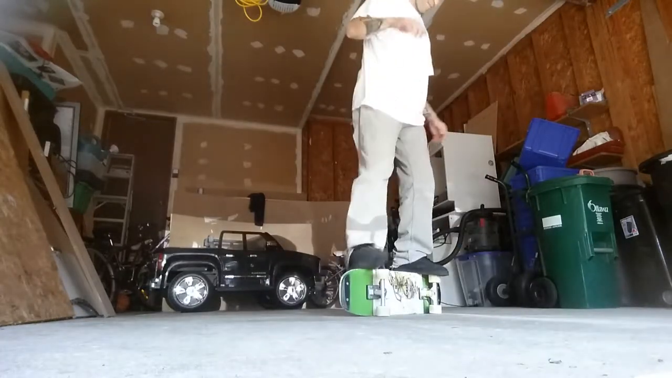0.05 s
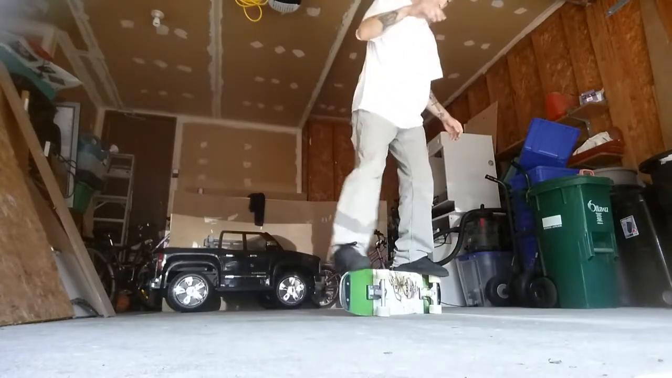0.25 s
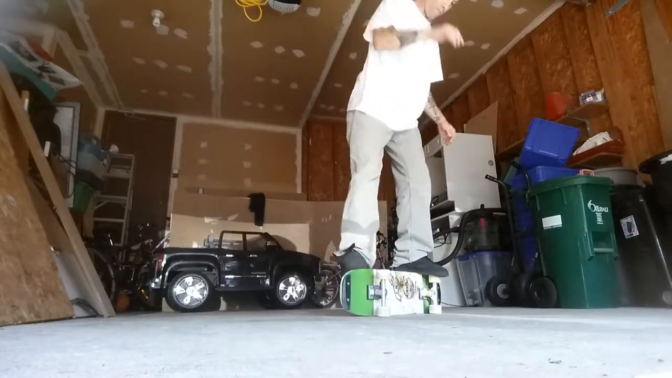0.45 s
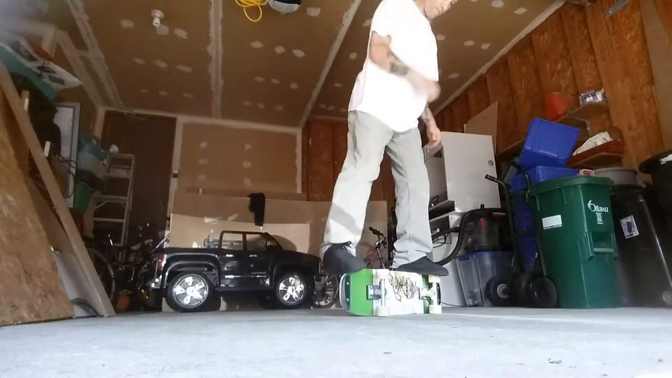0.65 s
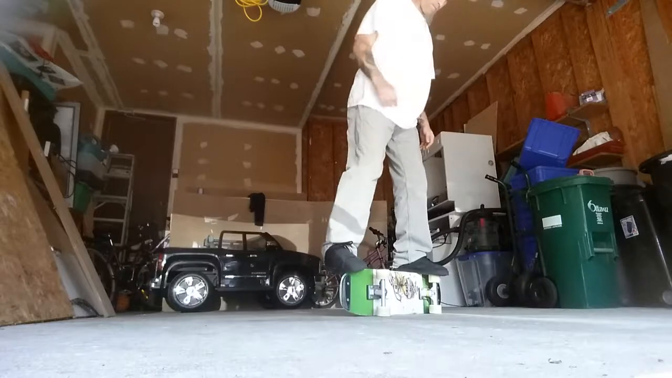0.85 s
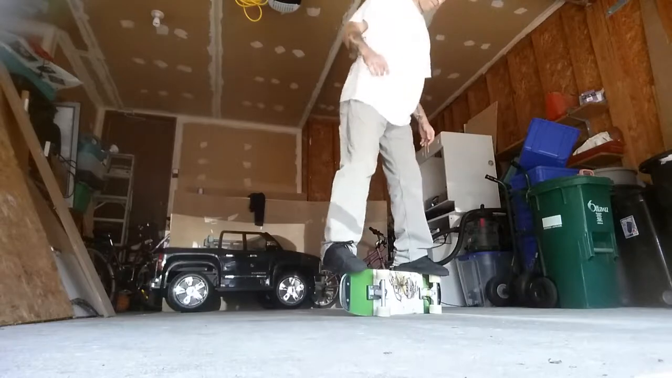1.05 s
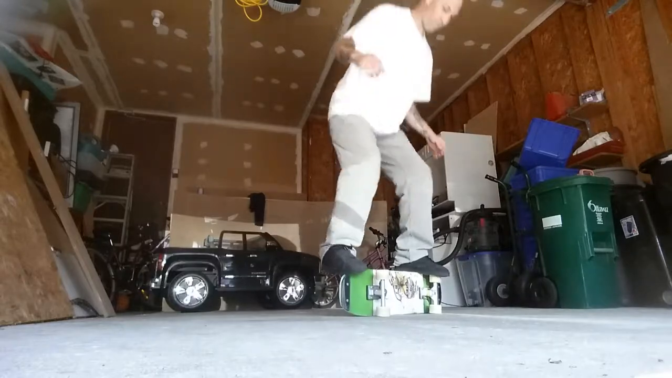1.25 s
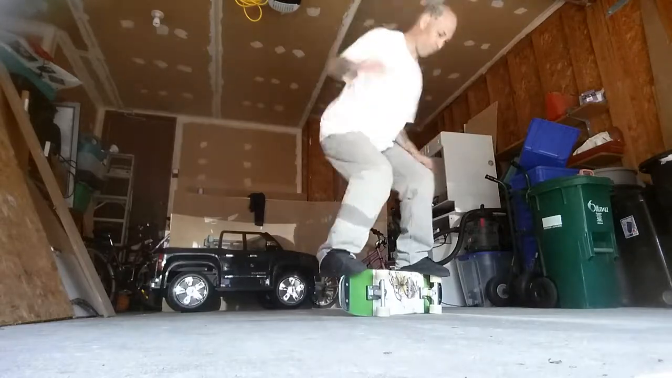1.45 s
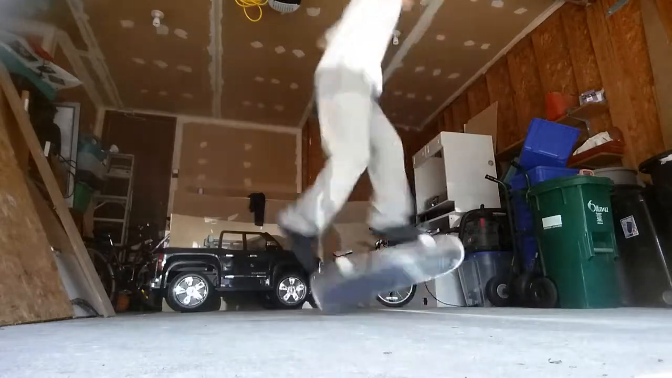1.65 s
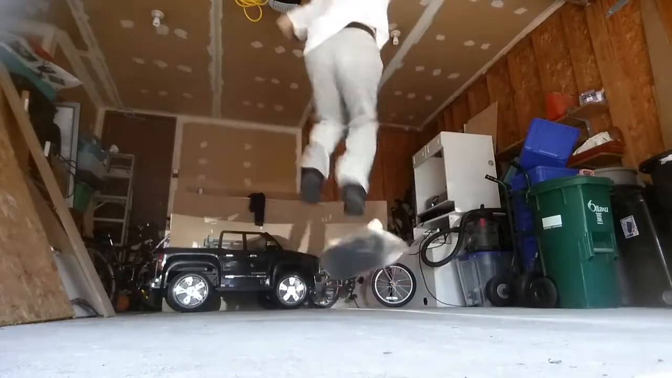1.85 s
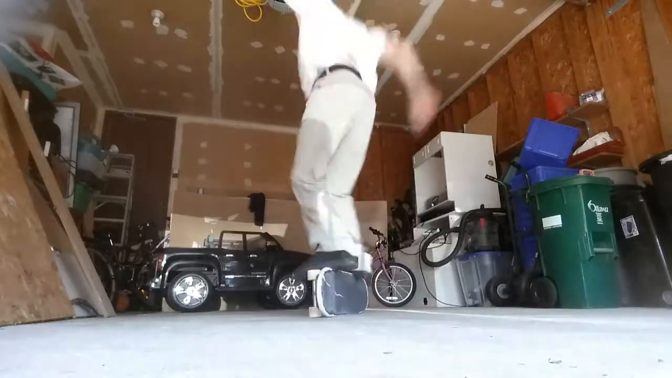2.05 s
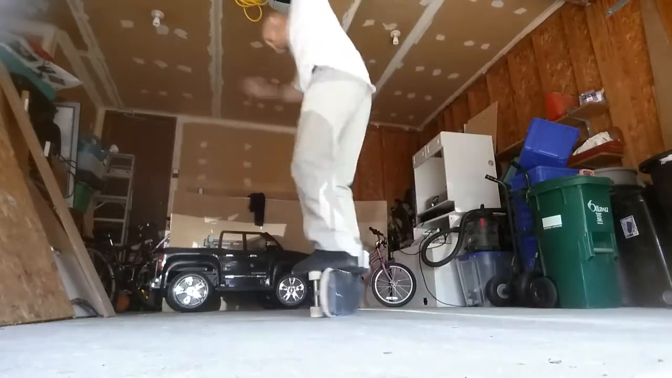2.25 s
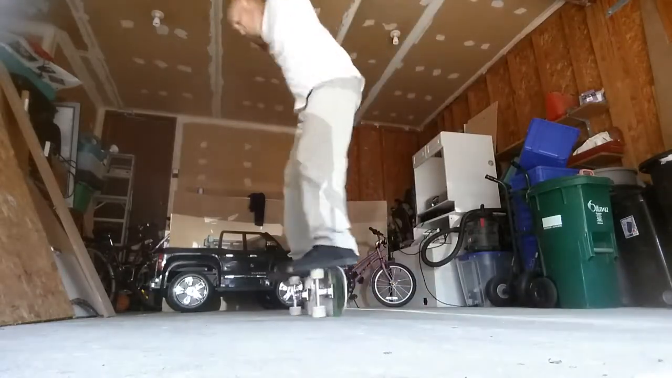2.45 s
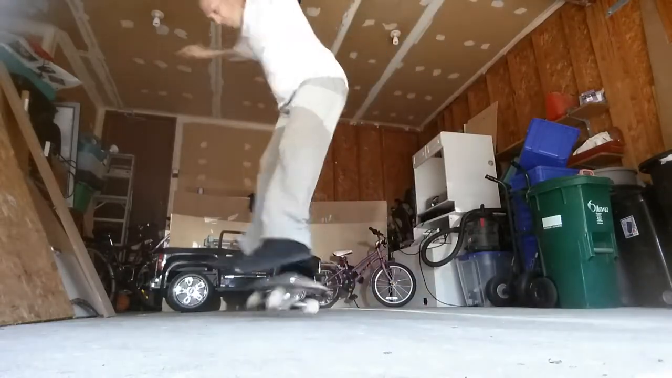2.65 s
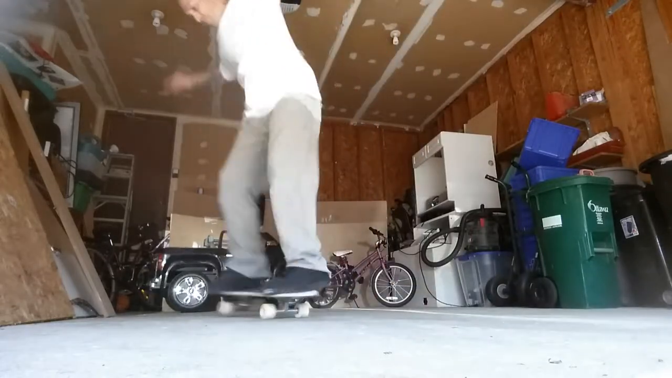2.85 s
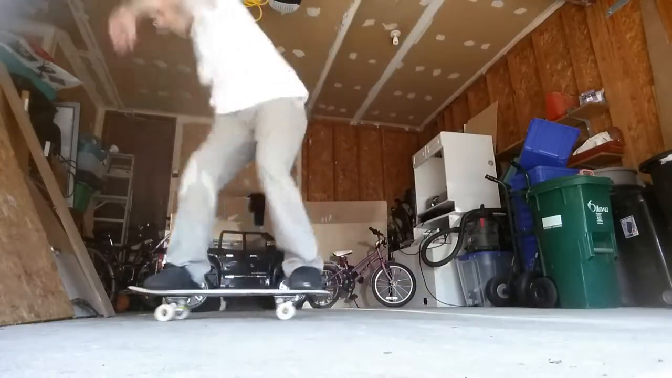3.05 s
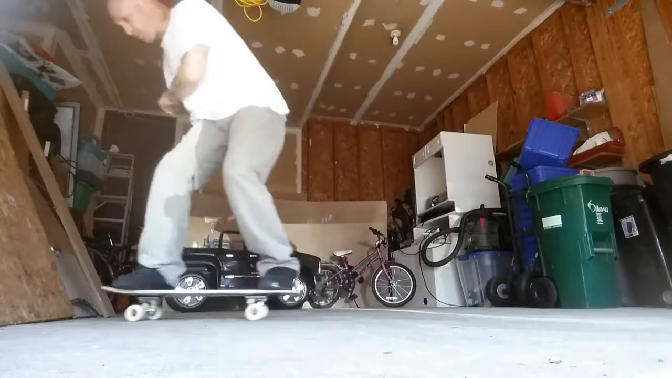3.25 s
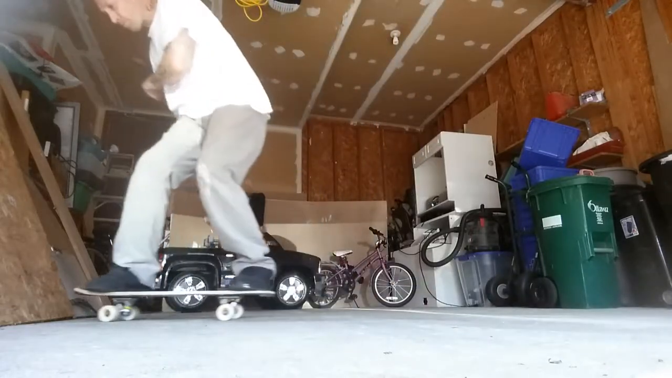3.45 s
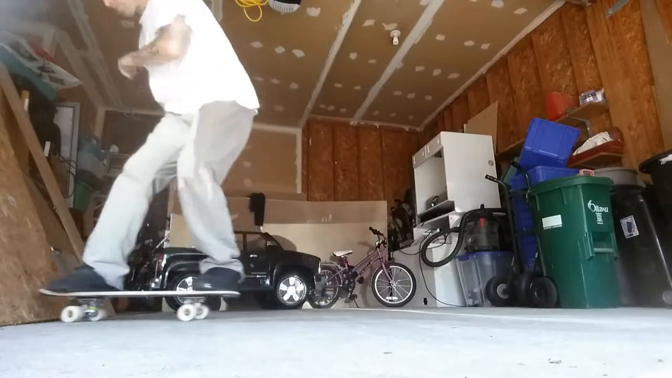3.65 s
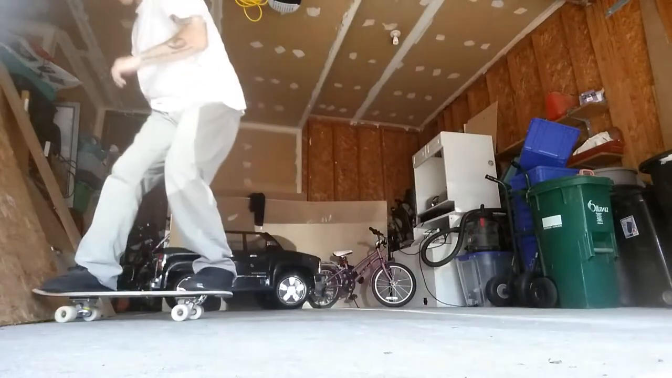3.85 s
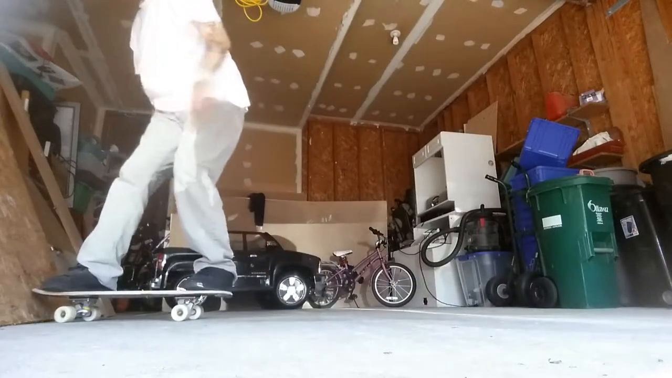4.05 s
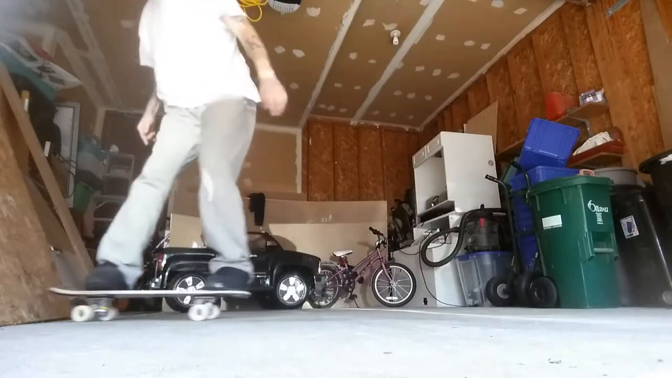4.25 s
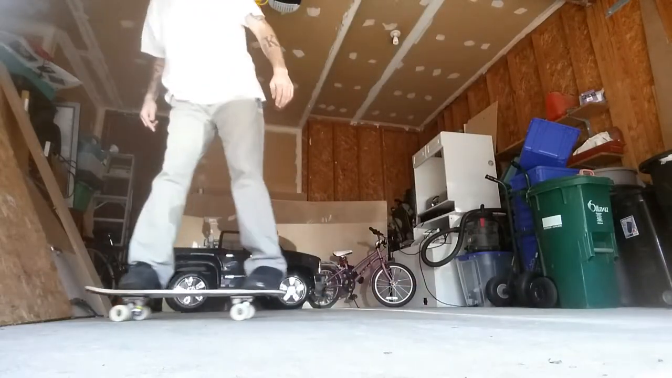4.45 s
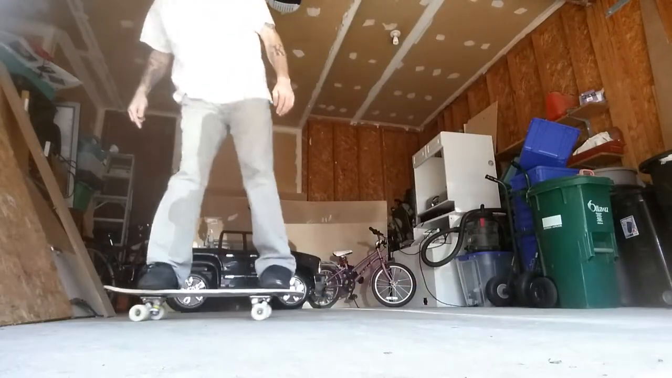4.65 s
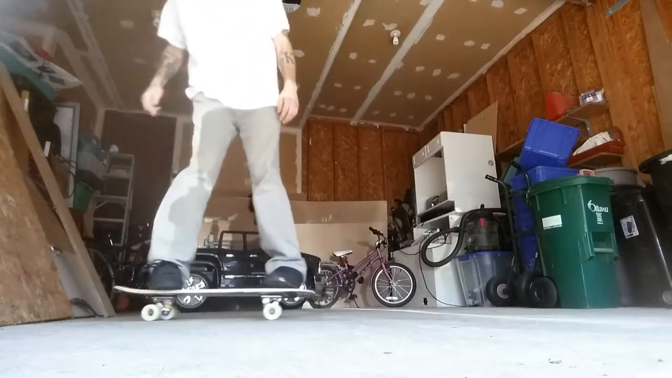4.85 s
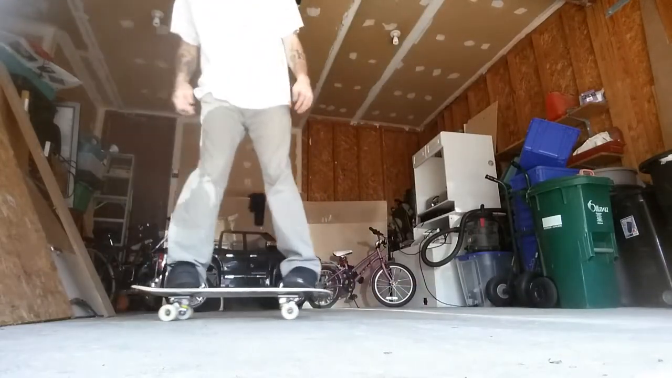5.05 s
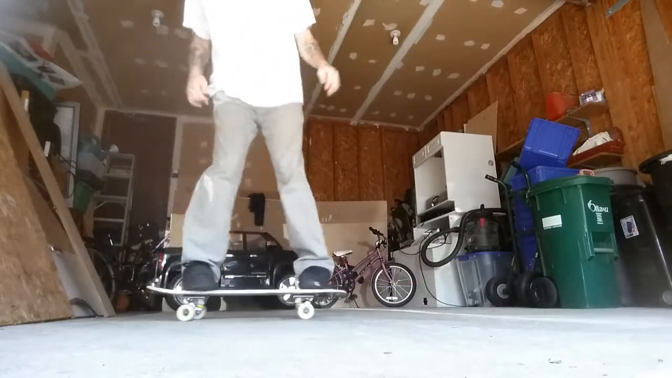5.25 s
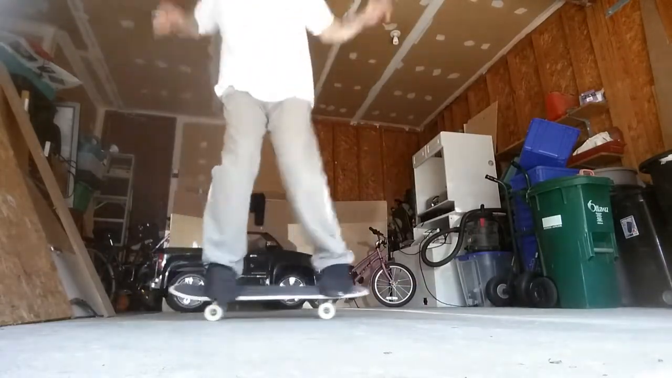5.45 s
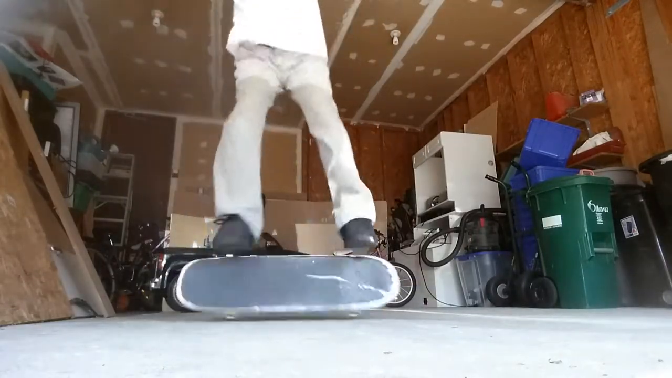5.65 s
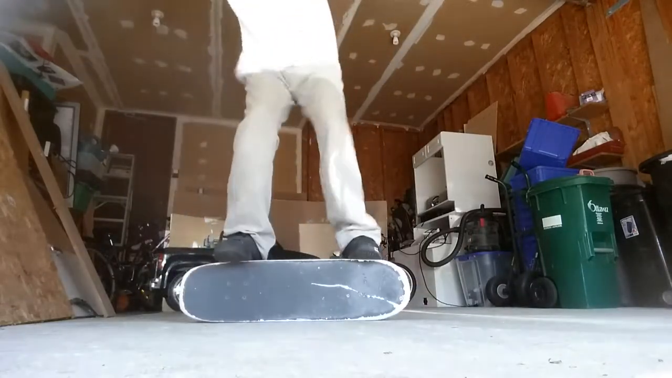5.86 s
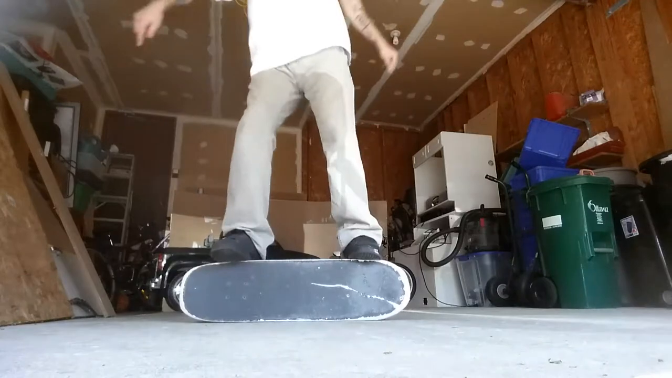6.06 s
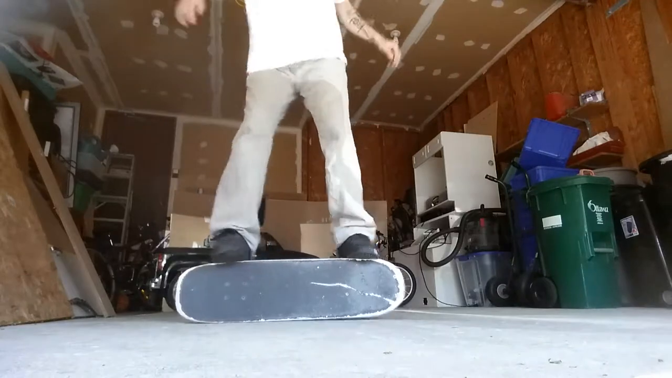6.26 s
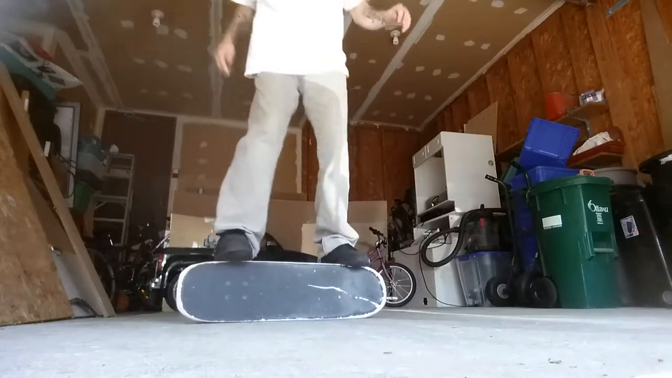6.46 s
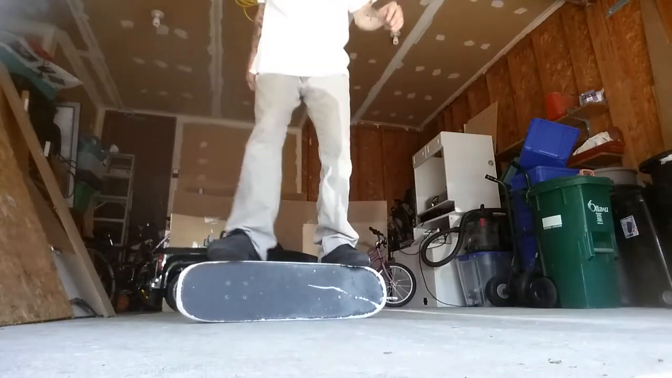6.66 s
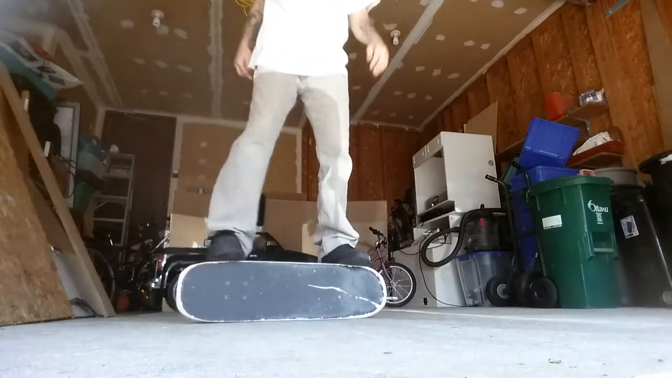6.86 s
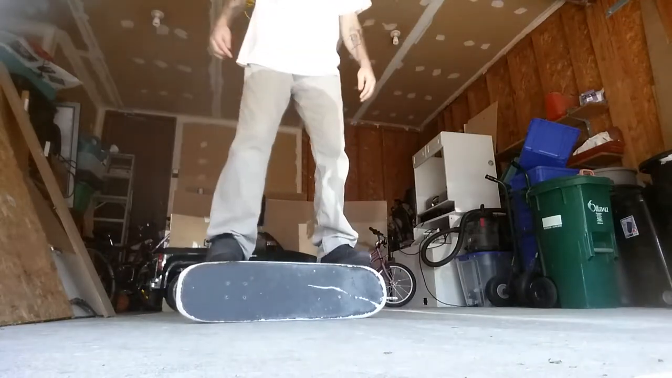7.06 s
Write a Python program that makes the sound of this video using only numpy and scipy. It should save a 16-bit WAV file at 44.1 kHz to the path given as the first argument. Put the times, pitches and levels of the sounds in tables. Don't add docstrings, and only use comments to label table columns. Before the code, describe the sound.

A skateboard on a garage concrete floor, heard very close from floor level, with short bright echoes from hard walls and a faint lumpy engine idle outside. From 0 to 0.7 s, shoes scuff gritty grip tape with wooden taps, about 0.05, 0.3 and 0.58. It quiets to the hum until about 1.5, when rubbing returns. At 1.67-1.8 the tail cracks and the deck clatters; a dragging scrape swells to a loud hard slam at 2.1. Wheels skid and knock at 2.5-2.65, then rattling contacts come at 2.83 and 3.11. Soft rolling follows, with a low thump at 3.84, then gentle rubs and tiny ticks to 5.4. Scuffing leads to sharp cracks at 5.65-5.71 and the heaviest, booming wooden crash at 5.83, its peak squashed. Near quiet returns, with light scrapes, a dull knock at 6.47 and faint settling taps until 7.1.

```python
import sys
import numpy as np
from scipy import signal
from scipy.fft import rfft, irfft, next_fast_len
from scipy.io import wavfile
from scipy.ndimage import uniform_filter1d, minimum_filter1d

SR = 44100
rng = np.random.default_rng(int(sys.argv[2]) if len(sys.argv) > 2 else 0)


def transcribe(u):
    v = np.clip(np.atleast_2d(u).T, -1, 1)
    q = np.round(v * 32767).astype(np.int16)
    wavfile.write(sys.argv[1], SR, q)


def volts_from_db(level):
    exponent = np.asarray(level, float) / 20
    return 10 ** exponent


N = 313992
T = np.arange(N) / SR

# [f/Hz, level/dB, time to fade by 60 dB/s]
DECK_MODES = [(349.8, 7.5, 0.15), (407, 2.5, 0.1), (513, -0.5, 0.35), (611, 11.5, 0.047),
              (650, 10.5, 0.059), (810, 19.5, 0.019), (1030, 11, 0.032), (1070, 9.5, 0.035),
              (1320, -1, 0.099), (1410, -12.5, 0.03), (1875, 5, 0.085), (1840, 2, 0.018),
              (2100, -9, 0.0047), (2260, -35, 0.11), (3100, -13, 0.04), (2880, -19, 0.037)]
# [f/Hz, level/dB]
SIDE_LEVEL = [(60, -19), (110, -20.5), (200, -10), (380, -8.5), (700, -4), (1290, 1), (2380, 1), (4400, 1),
              (8120, 3), (15000, -2)]


def evened(x):
    return x / np.sqrt(np.mean(x ** 2) + 1e-20)


def peak(x):
    return x / np.sqrt(uniform_filter1d(x ** 2, 200).max())


def read(points, hz):
    f, value = np.transpose(points)
    return np.interp(np.log(hz + 1), np.log(f + 1), value)


def coloured(x, points, share=1):
    size = next_fast_len(x.shape[-1])
    gain = volts_from_db(share * read(points, np.fft.rfftfreq(size, 1 / SR)))
    return irfft(rfft(x, size) * gain, size)[..., :x.shape[-1]]


def band(x, lo_hz, hi_hz):
    if lo_hz > 160:
        return signal.lfilter(*signal.butter(2, [lo_hz, hi_hz], "bandpass", fs=SR), x)
    return signal.sosfilt(signal.butter(2, [lo_hz, hi_hz], "bandpass", fs=SR, output="sos"), x)


def add(mix, s, sound):
    part = mix[round(s * SR):][:len(sound)]
    part += sound[:len(part)]


def rumble():
    # [f/Hz, level/dB per Hz]
    rumble_colour = [(15, -61.5), (25, -8.5), (124, -12.5), (201, -14), (240, -15.5), (374, -20.5),
                     (405, -16), (629, -25.5), (1040, -30.5), (1460, -40.5), (3000, -41), (3900, -70.5),
                     (6600, -120)]
    # [t/s, level/dB]
    low_level = [(0.0, -44.5), (0.5, -46), (0.89, -53), (1.09, -53), (1.33, -49), (2.0, -52),
                 (2.28, -59), (2.99, -59), (3.59, -60), (4.04, -48.5), (4.4, -58), (4.76, -57.5),
                 (5.15, -49.5), (5.79, -47.5), (5.97, -54), (6.09, -62), (6.9, -57), (7.12, -53)]
    # [t/s, f/Hz]
    firing_rate = [(0, 22.38), (.55, 22.28), (.95, 21.49), (1.3, 21.91), (1.7, 21.84), (7.12, 21.91)]
    # [multiple of the firing rate, level/dB]
    orders = [(3, -13), (4, -2.5), (5, 2.5), (6, -0.5), (8, -14.5), (11, -11), (12, -10)]
    whine_hz, whine_db, whine_end_s = 8680, -71, 1.65
    air_db, hiss_db, waver_db = -72, -72.5, 1.8

    noise = coloured(rng.standard_normal((2, N)), rumble_colour)
    side = noise[1] / noise[0].std()
    lumps = volts_from_db(3.3 * evened(band(rng.standard_normal(N), 0.62, 43)))
    mid = lumps * evened(noise[0])

    turns = np.cumsum(np.interp(T, *np.transpose(firing_rate))) / SR
    slow = rng.standard_normal((len(orders), N // 100 + 1))
    waver = waver_db * evened(band(slow, 40, 250))
    for (multiple, order_db), swell_by in zip(orders, waver):
        hum = np.sin(2 * np.pi * (round(multiple) * turns + rng.random()))
        mid = mid + volts_from_db(order_db + swell_by.repeat(100)[:N]) * hum

    s, db = np.transpose(low_level)
    low = volts_from_db(np.interp(T, s, db) + 4.5) * np.array([mid, lumps * coloured(side, SIDE_LEVEL)])
    breeze = rng.standard_normal((2, N))
    whine = volts_from_db(whine_db) * evened(band(breeze, whine_hz - 190, whine_hz + 190))
    air = volts_from_db(air_db) * evened(band(band(breeze, 12000, 16400), 11400, 15000))
    hiss = volts_from_db(hiss_db) * evened(band(rng.standard_normal((2, N)), 2500, 7200))
    return low + hiss + (whine + air) * (T < whine_end_s)


def deck_ring(centre_hz, octaves, luck, damping):
    t = np.arange(6000) / SR
    hz, db, t60 = np.transpose(DECK_MODES)[:, :, None]
    near_db = np.maximum(-6 * (np.log2(hz / centre_hz) / octaves) ** 2, -26)
    swing = np.sin(2 * np.pi * (hz * (1 + 0.025 * luck[1]) * t + luck[2]))
    fade = np.exp(-np.log(1000) * damping / t60 * t)
    onset = 1 - np.exp(-t / 0.000065)
    return (volts_from_db(db + near_db + 2.7 * luck[0]) * fade * swing).sum(0) * onset


def swell_db(t, rise, fall):
    away = abs(t) / np.where(t < 0, max(rise, .003), max(fall, .003))
    return -22 * away ** 1.53


def strokes(rows):
    gains = np.zeros((2, N // 50 + 1))
    t = np.arange(gains.shape[1]) * 50 / SR
    for s, rise, fall, rub_db, grit_db in rows:
        gains += volts_from_db(rub_db + np.array([[0], [grit_db]]) + swell_db(t - s, rise, fall))
    return [np.interp(T, t, g) for g in gains]


def patchy(x):
    z = signal.stft(x, nperseg=512)[2]
    patches = uniform_filter1d(rng.standard_normal(z.shape), size=6, axis=-2)
    patches = uniform_filter1d(patches, size=8, axis=-1)
    return signal.istft(z * volts_from_db(2.2 * evened(patches)), nperseg=512)[1][..., :N]


def scrape():
    # [top pressure t/s, rise/s, fall/s, rub level/dB, grit re rub/dB]
    shoes = [(0.0, .02, 0.016, -39, -12), (0.09, 0.12, 0.066, -58, 7), (0.14, 0.021, 0.22, -28.5, -13),
             (0.22, 0.079, 0.065, -36.5, 0.5), (0.35, 0.053, 0.11, -36, -3),
             (0.52, 0.072, 0.16, -35.5, -4.5), (0.66, 0.092, 0.2, -45.5, -8.5),
             (1.02, 0.03, 0.39, -63.5, -2), (1.47, 0.2, 0.18, -46, -4.5),
             (1.662, 0.013, 0.044, -38.5, -6.5), (1.91, 0.29, 0.023, -25.5, -7),
             (1.98, 0.068, 0.019, -29, -10)]
    # [top pressure t/s, rise/s, fall/s, rub level/dB, grit re rub/dB]
    wheels = [(2.3, 0.082, 0.023, -47, 0), (2.44, 0.11, 0.2, -36, -10), (2.52, 0.059, 0.11, -49, -1),
              (2.65, 0.089, 0.035, -42, -5.5), (2.76, 0.084, 0.084, -42, -7.5),
              (3.4, 0.12, 0.079, -50.5, -27.5), (3.59, 0.12, 0.031, -58, -6.5),
              (3.79, 0.15, 0.073, -51.5, -30), (3.97, 0.19, 0.15, -45.5, -10),
              (4.31, 0.068, 0.081, -54, -5.5), (4.44, 0.084, 0.079, -36, -14.5),
              (4.64, 0.15, 0.11, -49.5, -11), (4.79, 0.067, 0.26, -43, -6.5), (4.97, 0.067, 0.24, -45, -1),
              (5.17, 0.075, 0.23, -40.5, -27.5), (5.45, 0.18, 0.37, -44, 7), (5.57, 0.05, 0.11, -32.5, -15),
              (6.1, .04, 0.1, -59, -28.5), (6.315, 0.034, 0.039, -54.5, -25.5),
              (6.375, 0.018, 0.055, -45, -12.5), (6.435, 0.033, 0.016, -43.5, -18.5),
              (6.52, 0.084, 0.033, -45.5, 4), (6.71, 0.15, 0.023, -52.5, -5.5),
              (6.92, 0.26, 0.16, -53.5, -14.5)]

    size = volts_from_db(2.4 * np.minimum(rng.exponential(1, (2, N)), 4))
    hits = rng.random((2, N)) < 3000 / SR
    grains = size * hits * rng.standard_normal((2, N))

    rub = band(band(band(grains[0], 210, 2500), 250, 3600), 200, 2700)
    roll = evened(band(grains[0], 160, 300))
    shaken = signal.fftconvolve(grains[0], deck_ring(900, 3.0, np.ones(3) / 4, 0.93))[:N]
    rub = evened(evened(rub) + 0.46 * evened(shaken))
    grit = evened(band(band(grains[1], 2000, 7900), 2100, 8200))
    fizz = evened(band(band(grains[1], 9000, 14000), 9900, 21000))

    uneven = volts_from_db(2.6 * evened(band(rng.standard_normal((2, N)), 3.7, 49)))
    rub, grit = patchy(np.array([rub, grit])) * uneven
    out = np.zeros(N)
    for rows, fizz_db, roll_db in (shoes, -11.5, -22), (wheels, -26, -2.5):
        press, slide = strokes(rows)
        out += press * (volts_from_db(2.0) * rub + volts_from_db(roll_db) * roll)
        out += slide * volts_from_db(1.5) * (grit + volts_from_db(fizz_db) * fizz)
    return out


def knock(peak_db, ring_hz, slap_db, crack_db, t60):
    t = np.arange(6000) / SR
    luck = rng.standard_normal((3, len(DECK_MODES), 1))
    clap, hiss = rng.standard_normal((2, len(t)))
    rise_s = np.clip(0.00043 * volts_from_db(-.7 * (peak_db + 18.0)), .0002, .003)
    rise = 1 - np.exp(-t / rise_s)
    pair = np.sin(2 * np.pi * ring_hz * t) + 0.17 * np.sin(2 * np.pi * 1.12 * ring_hz * t)
    ring = rise * volts_from_db(-60 * t / t60) * pair
    ring = ring * (1 + 0.34 * evened(band(hiss, 30, 200)))
    wood = peak(ring) + 0.79 * peak(rise * deck_ring(ring_hz, 0.99, luck, 0.081 / t60))
    slap = band(band(clap * rise * np.exp(-(t / 0.005) ** 2), 1000, 2600), 910, 3700)
    crack = band(band(hiss * rise * np.exp(-t / 0.0042), 2500, 7400), 900, 9500)
    blow = peak(wood) + volts_from_db(slap_db - 0.5) * peak(slap) + volts_from_db(crack_db + 4.5) * peak(crack)
    return volts_from_db(peak_db - 3.5) * blow


def slam(peak_db, ring_hz, thud_db, crack_db, length):
    t = np.arange(9000) / SR
    chance, force = rng.random(len(t)), rng.exponential(1, len(t))
    hiss, boom, clap = rng.standard_normal((3, len(t)))
    luck = 0.61 * rng.standard_normal((3, len(DECK_MODES), 1))

    hits = (chance < 1800 / SR) * np.sign(hiss)
    chatter = hits * volts_from_db(5.6 * np.minimum(force, 3) - 13.0) * np.exp(-(t / length) ** 2)
    chatter[0] = 0.27
    wood = signal.fftconvolve(chatter, deck_ring(ring_hz, 3.4, luck, 3.5))[:len(t)]
    spray = np.convolve(abs(chatter), np.exp(-t[:600] / 0.0012))[:len(t)]
    slap = band(band(clap * spray, 0.26 * ring_hz, 1.505 * ring_hz), 100, 15.0 * ring_hz)
    crack = band(band(hiss * spray, 2400, 9100), 800, 8800)
    thud = band(boom * (1 - np.exp(-t / 0.0054)) * np.exp(-t / (0.017 + length)), 170, 330)
    body = peak(peak(wood) + 1.12 * peak(slap))
    blow = body + volts_from_db(thud_db - 7.0) * peak(thud) + volts_from_db(crack_db - 2.5) * peak(crack)
    return volts_from_db(peak_db - 0.5) * blow


def board():
    # [t/s, peak level/dB, ring f/Hz, slap re peak/dB, crack re peak/dB]
    clacks = [(0.05, -12.5, 1126, -11.5, -47), (0.522, -29, 1320, 5, -25),
              (1.667, -11.5, 1863, -2.5, -24.5), (2.121, 0, 2115, -7, -16.5), (2.487, -9, 1510, -24, -14),
              (2.531, -36, 1410, -16.5, -12), (2.5957, -30, 2090, 1, -17.5),
              (2.72, -31.5, 900, -11.5, -20.5), (2.815, -17, 885, 8, -2), (3.106, -16.5, 1070, -1.5, 3),
              (3.84, -13.5, 1390, -33, -51), (4.754, -39, 560, -5, -22), (5.144, -22.5, 890, -6, -9),
              (5.637, -21, 1587, -6.5, -3.5), (5.649, -9.5, 1187, -28, -14.5), (5.711, -1.5, 1445, -4, -19),
              (5.826, 12, 494, -13, -33), (5.843, 9, 610, -11, -20), (6.266, -39.5, 408, -32, -38),
              (6.346, -32.5, 826, -36, -34), (6.43, -22, 790, -40, -40), (6.787, -39, 970, -20.5, -36),
              (7.017, -30, 1054, -36.5, -42)]
    # [t/s, peak level/dB, ring f/Hz, slap re peak/dB, crack re peak/dB]
    knocks = [(0.132, -22, 666, -11, -25), (0.297, -14.5, 423, -1, -15.5), (0.497, -33.5, 942, 6.5, -35),
              (0.5773, -17, 657, 0, -17), (1.005, -34.5, 685, -24, -18), (1.721, -13, 533, -8.5, -18),
              (1.755, -0.5, 1025, 0.5, -11), (2.086, -13.5, 650, -13, -23.5), (2.1006, 9, 1030, -1, -43),
              (2.14, -1.5, 702, -26, -28.5), (2.536, -16.5, 382, -41, -17), (2.629, -19, 466, -25.5, -20.5),
              (2.829, -22.5, 325, -35.5, -40), (2.889, -13, 339, 1.5, -24.5), (3.1205, -15.5, 1324, -11, 4),
              (3.839, -10.5, 611, -33, -54), (5.7023, -6, 1036, -14, -10), (6.4727, -9.5, 732, -6.5, -42),
              (6.88, -42, 606, -28.5, -29), (6.902, -41, 703, -23, -45)]
    # [t/s, peak level/dB, ring f/Hz, thud re peak/dB, crack
    # re peak/dB]
    rattles = [(0.296, -23.5, 1400, -21, -17), (0.579, -31, 668, -19, -17), (2.484, -22, 1430, -3, -9.5),
               (3.836, -20.5, 578, 12.5, -20.5), (5.638, -17, 1170, -17, -4), (6.429, -31.5, 775, -27, -33),
               (6.473, -21, 610, -22.5, -13)]
    # [t/s, peak level/dB, centre f/Hz]
    ticks = [(3.709, -58, 5370), (3.7788, -57, 4370), (4.363, -72, 6370), (4.416, -40.5, 5750),
             (4.63, -54.5, 5730), (4.786, -50, 5150), (5.0784, -50, 7060), (5.225, -40, 6650)]
    free_t60, pinned_t60 = 0.059, 0.025

    out, t = np.zeros(N), np.arange(3000) / SR
    for s, *row in clacks:
        add(out, s, knock(*row, pinned_t60))
    for s, db, *row in knocks:
        add(out, s, knock(db, *row, free_t60 * volts_from_db(-.16 * db)))
    for s, *row in rattles:
        add(out, s, slam(*row, 0.056))
    for s, db, hz in ticks:
        click = rng.standard_normal(len(t)) * np.exp(-t / 0.0053)
        add(out, s, volts_from_db(db + 3.0) * peak(band(click, 0.61 * hz, 1.16 * hz)))
    return out


def further_contacts():
    # [top pressure t/s, rise/s, fall/s, level/dB, centre f/Hz]
    scuffs = [(0.01, .02, 0.04, -49, 440), (2.569, 0.029, 0.049, -31, 404), (2.7, 0.035, 0.073, -37.5, 430),
              (3.699, 0.049, 0.16, -47.5, 200), (3.72, 0.053, 0.032, -62, 1970),
              (3.8, 0.036, .04, -64, 2050), (5.359, 0.037, .1, -45.5, 1490),
              (5.429, 0.16, 0.11, -39.5, 1800), (5.49, 0.11, 0.22, -40.5, 1900),
              (5.558, .02, 0.067, -36.5, 2500), (5.75, 0.048, 0.067, -25.5, 3100),
              (5.869, 0.024, 0.086, -26.5, 3000), (2.16, 0.046, 0.22, -30.5, 2600),
              (2.3, 0.15, 0.1, -37.5, 453), (2.42, 0.058, 0.087, -39.5, 700), (5.169, .02, 0.18, -42, 1500),
              (5.51, 0.06, .08, -44.5, 5200), (0.2, 0.073, 0.089, -41, 12000), (0.92, 0.17, .1, -66, 4500),
              (1.69, 0.016, .07, -35.5, 11000), (1.799, 0.11, 0.14, -29.5, 11000),
              (2.84, 0.022, 0.12, -37, 11000), (3.115, 0.0095, 0.052, -33, 11000),
              (5.655, 0.014, 0.074, -33.5, 11000), (5.73, 0.034, 0.062, -26.5, 11000),
              (5.85, .025, 0.059, -28.5, 11000), (5.411, 0.096, .12, -38, 5000),
              (3.87, 0.026, 0.087, -54, 11000), (5.16, .015, 0.076, -49, 11000),
              (2.6, 0.086, 0.13, -53, 11000), (0.649, .1, 0.2, -51.5, 3000), (5.87, .03, 0.11, -23, 1500),
              (1.8, .01, 0.044, -57, 1350), (1.99, 0.059, .06, -33, 1100)]
    # [t/s, peak level/dB, ring f/Hz, slap re
    # peak/dB, time to fade by 60 dB/s]
    further_hits = [(0.2967, -11, 1687, -3.5, 0.028), (0.325, -14, 416, -34, 0.11),
                    (0.62, -27.5, 686, -28, 0.13), (1.691, -26, 676, -7, 0.054), (1.784, -2, 719, -23.5, 0.1),
                    (1.975, -28, 1183, -13, 0.066), (2.1487, -17, 810, 7, .04), (2.169, -10.5, 398, 1, 0.21),
                    (2.109, -14.5, 413, -34, 0.18), (2.206, -20, 455, -26, 0.16),
                    (2.505, -14.5, 381, -18, 0.075), (2.545, -19.5, 390, -28, 0.13),
                    (2.625, -30, 2990, -8.5, .025), (2.659, -28, 488, -34.5, 0.15),
                    (2.761, -37.5, 400, -20.5, 0.16), (3.845, -7, 246.8, -41, 0.14),
                    (3.885, -17, 580, -8, .07), (3.938, -24, 261, -24, 0.18), (5.549, -29, 850, -0.5, 0.029),
                    (5.6688, -14.5, 1410, -5, 0.033), (5.68, -14, 709, -3.5, 0.088),
                    (5.725, -18.5, 985, 0.5, 0.043), (5.8182, -7, 994, -6.5, .03),
                    (5.858, -10, 443, -18.5, .06), (6.358, -50, 5800, -17, .04),
                    (0.0501, -16, 1980, -13.5, 0.025), (0.59, -22, 685, -26, 0.16),
                    (1.668, -27, 3040, -27.5, 0.05), (2.1232, -9.5, 1380, 0, .025),
                    (2.488, -19.5, 1584, -4, 0.038), (2.541, -32, 2100, -8, 0.033),
                    (2.598, -27.5, 1310, -1, .03), (3.8414, -32, 1360, -30, 0.055),
                    (5.7112, -6, 2990, -7, 0.018), (2.828, -16.5, 348, -34.5, 0.17),
                    (5.045, -47, 1280, 2, 0.026), (5.087, -40, 1500, 3, 0.033), (5.154, -40, 1280, -2, 0.026),
                    (6.495, -13.5, 421, -22, 0.067), (6.96, -36.5, 449, -32, 0.14),
                    (3.778, -46, 2100, -3, 0.026), (2.101, -6.5, 2520, 2, .04),
                    (1.653, -32, 612, -20, 0.044), (1.726, -17, 957, -8, 0.033), (1.762, -7.5, 2050, -4, 0.044),
               (1.81, -8, 767, -5, 0.053), (2.0938, -9, 900, 2, 0.032), (2.142, -5, 800, -15, 0.02),
               (2.645, -20, 451.7, -32.5, .14), (2.742, -43, 1490, 0, .025), (2.856, -15, 1274, 1, .03),
               (2.901, -12.5, 419, -7, 0.034), (3.128, -12.5, 1002, -6.5, 0.027),
               (3.851, -14.5, 670, -29, 0.074), (3.94, -17, 375, -19, 0.035),
               (5.8275, -0.5, 1380, -2.5, 0.051), (5.854, -18.5, 1334, -6, 0.044),
               (5.95, -18, 630, -10, 0.016), (5.984, -24.5, 482, -37, 0.053),
               (6.515, -32, 1070, -15.5, 0.032), (6.55, -31, 329, -32, 0.084),
               (6.97, -46, 1130, -22.5, .03)]

    out, t = np.zeros(N), np.arange(12000) / SR - .1
    for s, rise, fall, db, hz in scuffs:
        grit = volts_from_db(2.4 * rng.exponential(1, len(t))) * rng.standard_normal(len(t))
        width = 1.16 + 0.0098 * hz / 1000
        drag = evened(band(grit, hz / width, hz * width)) * volts_from_db(db + swell_db(t, rise, fall))
        add(out, max(s + t[0], 0), drag[t >= -s])
    for s, db, hz, slap_db, t60 in further_hits:
        add(out, s, knock(db, hz, slap_db, slap_db - 11, t60))
    return out


def landings():
    # [t/s, peak level/dB, ring f/Hz, thud re peak/dB, crack re peak/dB]
    slams = [(1.666, -17.5, 654, -9, -8), (1.752, -9, 1079, -50.5, -11), (2.1007, -3.5, 1199, -20, -15.5),
             (2.816, -18.5, 710, 0, -1.5), (2.863, -17, 1230, -28, -36.5), (3.104, -13, 1252, -17.5, -11),
             (5.702, -13.5, 885, -37, -10.5), (5.817, -15.5, 667, -41.5, -7)]
    # [t/s, peak level/dB, f/Hz, length/s]
    booms = [(0.29, -38, 94.5, 0.026), (1.674, -39, 148, 0.052), (1.777, -17, 69.9, 0.096),
             (2.109, -7.5, 181, 0.031), (2.489, -19, 120.5, 0.023), (2.515, -24.5, 226.4, 0.038),
             (2.646, -28, 204.7, 0.036), (2.865, -24.5, 132.3, 0.065), (3.849, -15, 173.8, 0.075),
             (5.704, -36, 116.6, 0.15), (5.847, -9, 130, 0.03), (6.479, -15, 143.6, 0.033)]
    # [t/s, peak level/dB, f/Hz, length/s]
    shudders = [(1.678, -23, 72.8, 0.059), (1.919, -31, 70.8, 0.12), (3.865, -31.5, 40.4, 0.14),
                (3.867, -29.5, 63.5, 0.12), (3.966, -44.5, 70.3, 0.14), (5.736, -29.5, 72, 0.091),
                (5.9, -48.5, 72.2, 0.16), (6.483, -34, 55.6, 0.088)]

    out, t = np.zeros(N), np.arange(12000) / SR
    for s, *row in slams:
        add(out, s, slam(*row, 0.081))
    for s, db, hz, length in booms + shudders:
        swing = t * np.exp(-t / (0.23 * length)) * np.sin(2 * np.pi * hz * t)
        add(out, s - .007, volts_from_db(db - 4.5) * peak(swing))
    return out


def walls():
    # [f/Hz, time to fade by 60 dB/s]
    echo_t60 = [(60, 0.14), (260, 0.3), (700, 0.34), (1840, 0.38), (4850, 0.41), (12000, 0.27)]
    size = SR // 2
    taps = np.zeros((3, 2, size))
    at = np.arange(130, size - 20, 16) + rng.integers(0, 16, (3, 2, (size - 135) // 16))
    np.put_along_axis(taps, at, rng.choice([-1., 1.], at.shape), 2)
    hz, t, z = signal.stft(taps, SR, nperseg=256)
    fade = volts_from_db(-60 * t / read(echo_t60, hz)[:, None])
    tails = signal.istft(z * fade, SR, nperseg=256)[1]
    return tails / np.linalg.norm(tails[0, 0])


def garage(x, tails):
    turn = np.sqrt(2 / 3) * np.cos(2 * np.pi * (1.3 * T + np.arange(3)[:, None] / 3))
    mid, side = signal.fftconvolve((x * turn)[:, None], tails, axes=2).sum(0)[:, :N]
    return np.array([mid, volts_from_db(1.0) * coloured(side, SIDE_LEVEL)])


def scene():
    low, rubs = rumble(), scrape()
    knocks = board() + further_contacts()
    slams = landings()
    sent = volts_from_db(1.0) * slams + volts_from_db(-5.0) * knocks + volts_from_db(-5.5) * rubs
    mid, side = garage(sent, walls()) + low
    mid = mid + slams + knocks + volts_from_db(-4.0) * rubs
    return np.array([mid + side, mid - side])


def band_limit(x):
    return signal.sosfilt(signal.butter(12, 15820, fs=SR, output="sos"), x)


def record(dry):
    # [f/Hz, level/dB]
    balance = [(60, -1.5), (92, -2), (140, -2.5), (210, -0.5), (330, -2.5), (500, -2.5), (770, -2),
               (1170, -3.5), (1790, -2), (2740, -2.5), (4190, -8.5), (6410, -13.5), (9810, 15), (15000, 31)]
    # [f/Hz, level/dB]
    mic_colour = [(30, -20.5), (70, -4.5), (1500, -4), (3000, -8.5), (3700, -14), (5000, -12), (6600, -7),
                  (7600, -6.5), (9200, -19.5), (14200, -20), (14900, -31.5), (15800, -84.5)]
    x = np.array([coloured(dry[0], balance, .5), coloured(dry[1], balance, -.5)])
    x = coloured(x, mic_colour)

    power_db = 10 * np.log10(abs(uniform_filter1d((x ** 2).mean(0), 300)) + 1e-12)
    coming_db = -minimum_filter1d(-power_db, size=700, origin=-349)
    fall = T * 960.0
    over_db = np.maximum(np.maximum.accumulate(coming_db + fall) - fall + 15.5, 0)
    far_db = -minimum_filter1d(-power_db, size=1500, origin=-749)
    x = x / volts_from_db(0.45 * uniform_filter1d(np.maximum(far_db + 10.5, 0), size=900))
    x = x / volts_from_db(0.11 * uniform_filter1d(over_db, 300))
    limited = np.tanh(x / 1.053) * 1.04
    return band_limit(limited)


dry = scene()
out = record(dry)
transcribe(out)
```